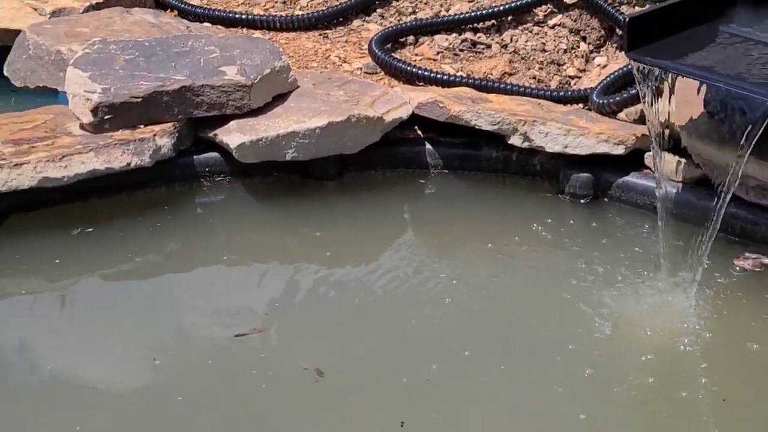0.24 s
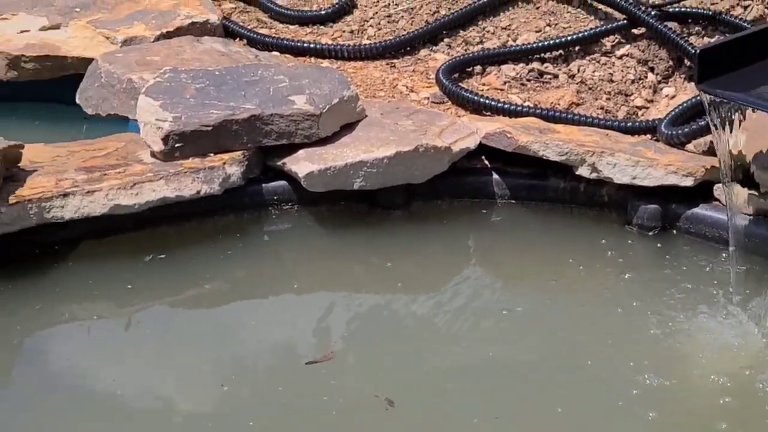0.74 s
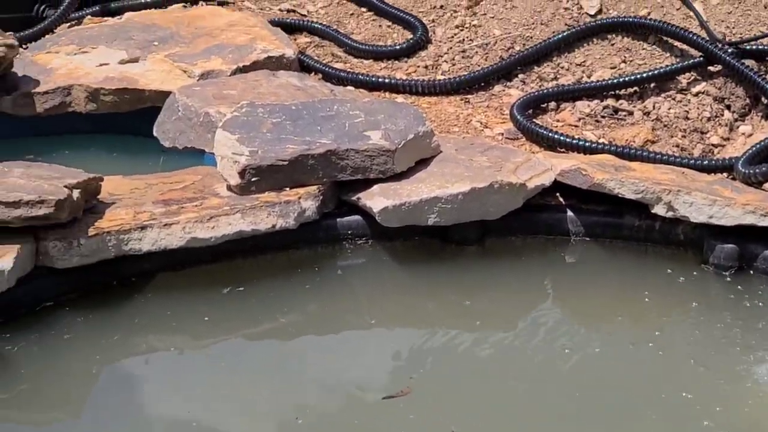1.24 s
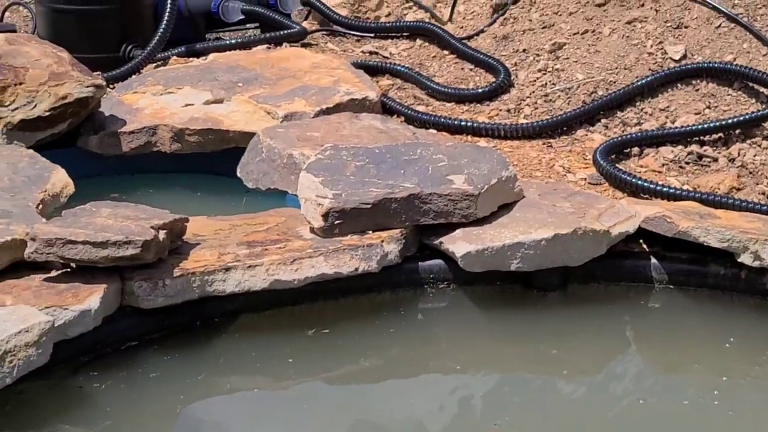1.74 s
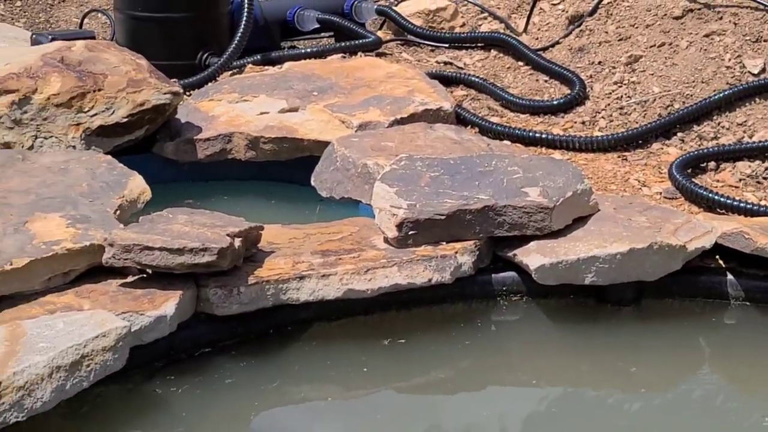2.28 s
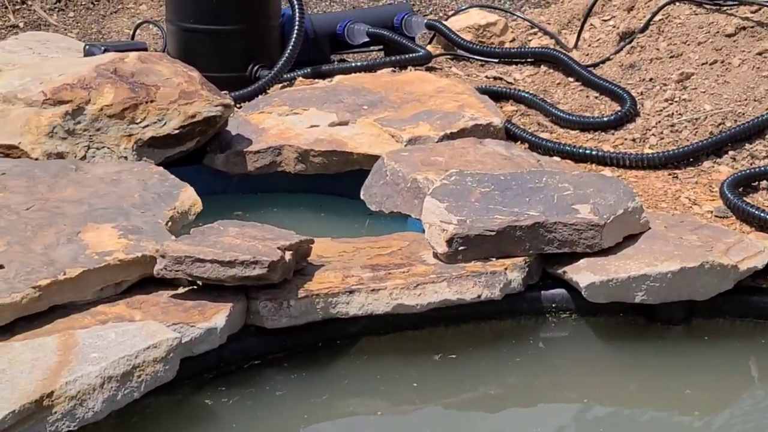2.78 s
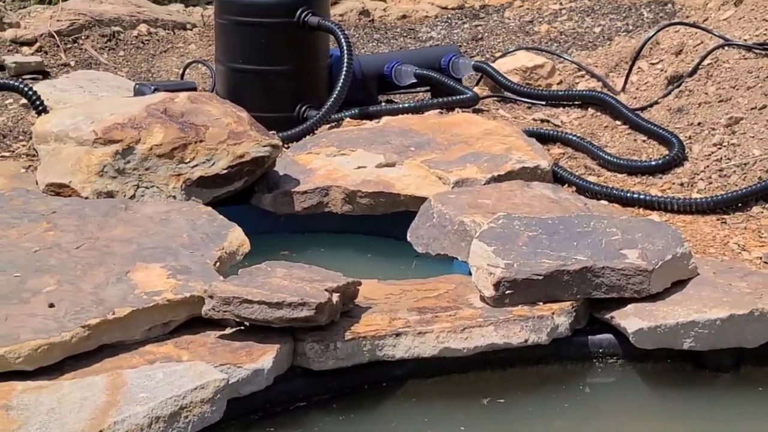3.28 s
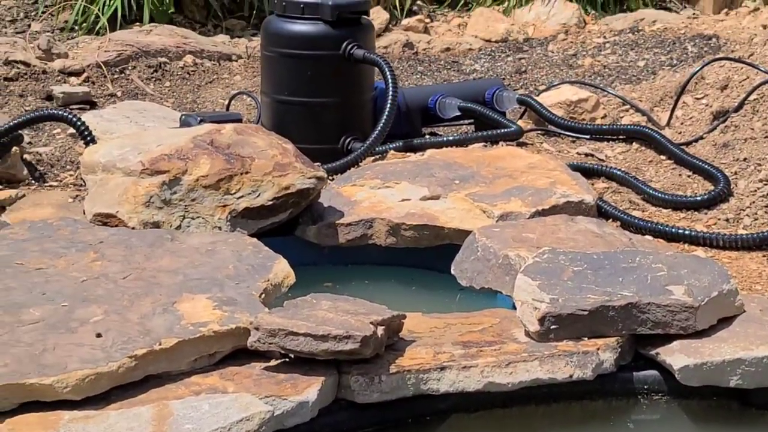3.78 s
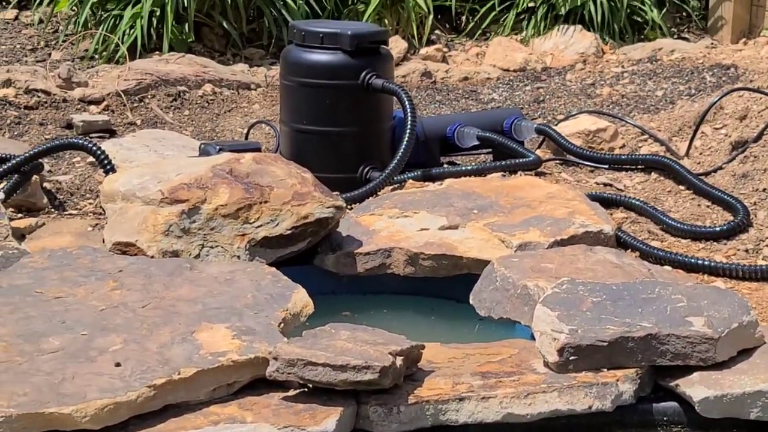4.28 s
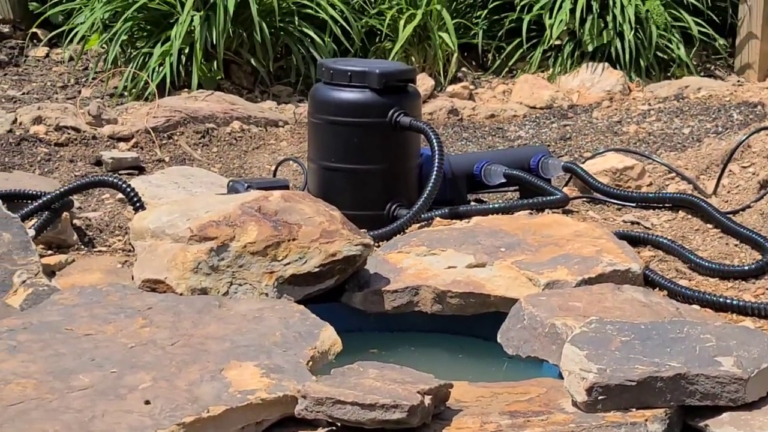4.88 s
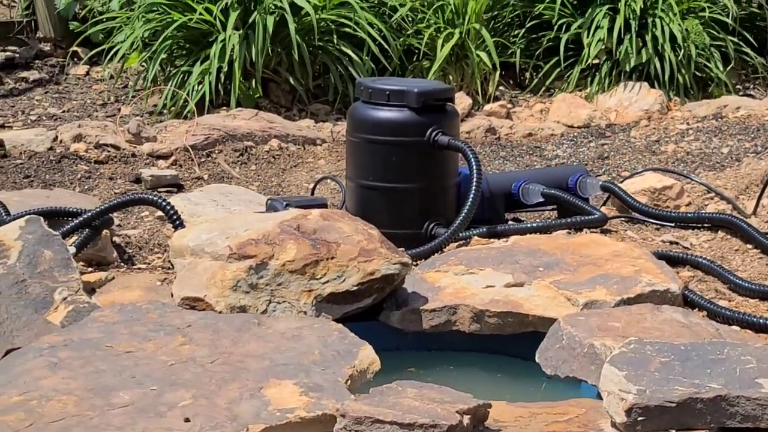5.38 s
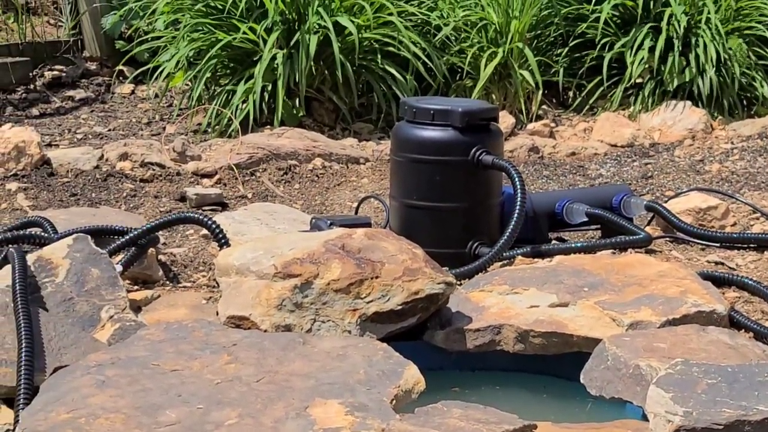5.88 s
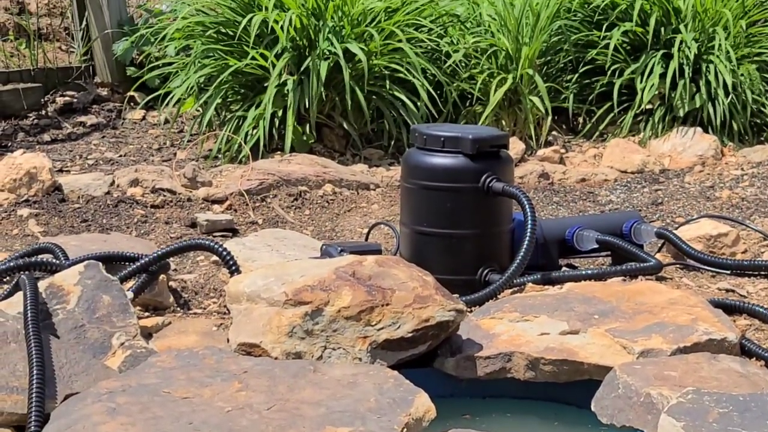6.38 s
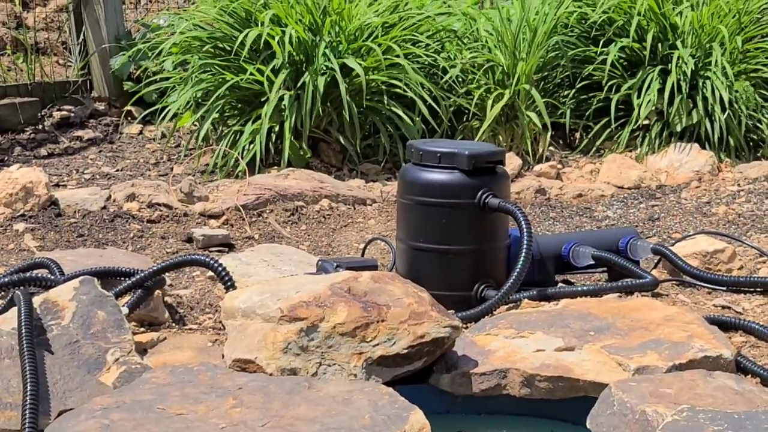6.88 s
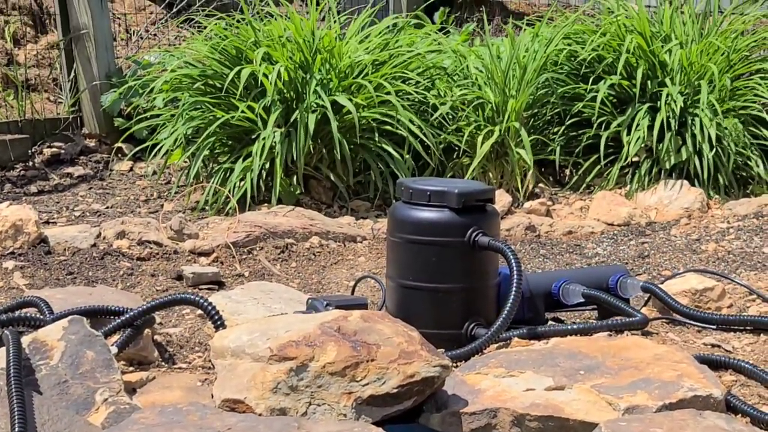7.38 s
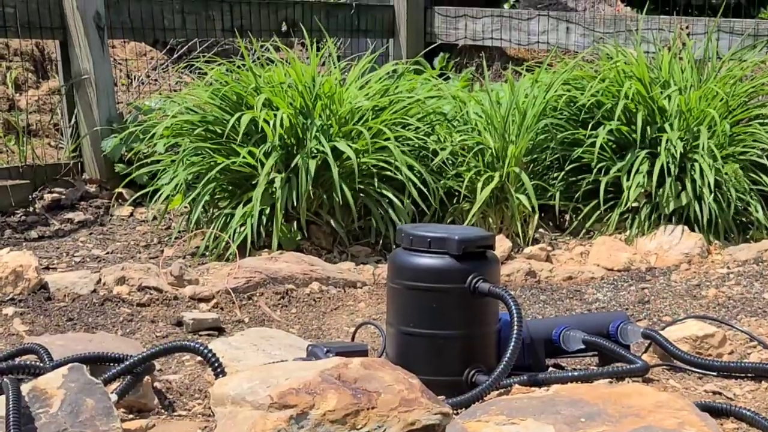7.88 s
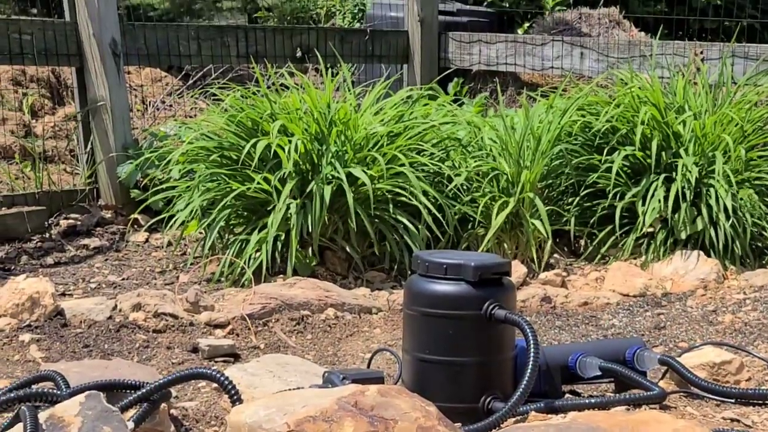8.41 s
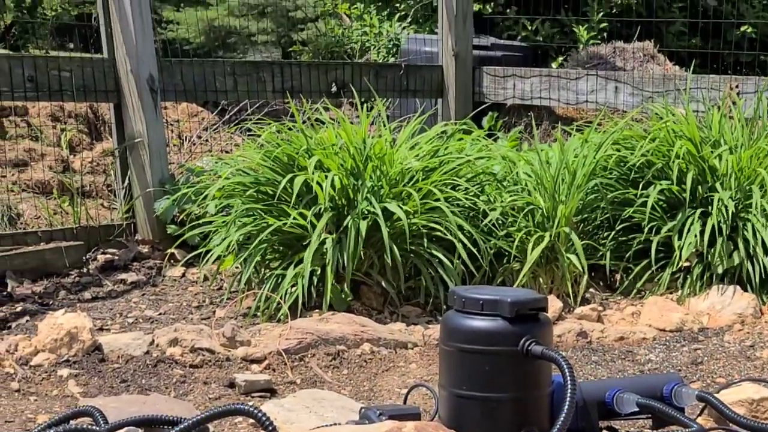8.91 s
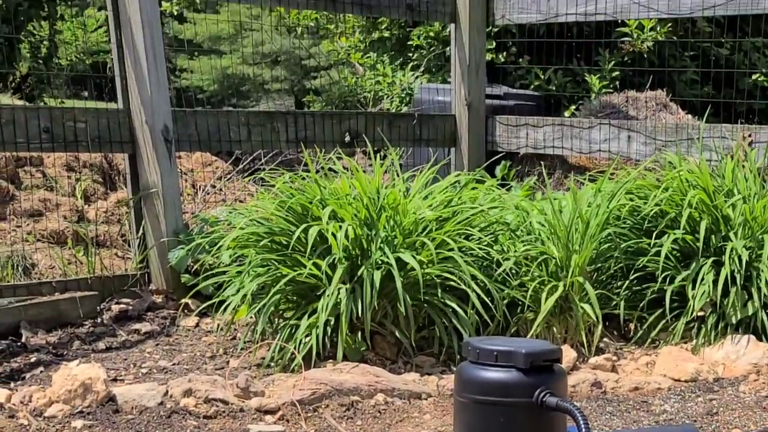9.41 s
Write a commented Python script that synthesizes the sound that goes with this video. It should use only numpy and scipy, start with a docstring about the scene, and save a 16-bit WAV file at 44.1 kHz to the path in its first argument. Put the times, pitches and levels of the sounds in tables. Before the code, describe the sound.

Outdoor pond with steady trickling and splashing water, two buzzy bird calls, then a bright, lively songbird over a faint pump hum and wind rumbles.

```python
"""A songbird strings whistled phrases together in a garden while a small waterfall splashes into a pond.
Farther birds whistle, buzz, chip and call, a pump drones, and gusts of wind thump on hand-held microphones.
Bird notes are near-sine tones gliding along pitch and level tables, with echoes; buzzes are shaken tones.
Water is banded noise with random drops, ringing bubbles and noise bursts; pump, wind and rasps are shaped noise."""
import sys
import numpy as np
from scipy import signal
from scipy.fft import rfft, irfft, next_fast_len
from scipy.io import wavfile
from scipy.ndimage import uniform_filter1d

SR = 44100
rng = np.random.default_rng(int(sys.argv[2]) if len(sys.argv) > 2 else 0)


def wrap_up_sound(samples):
    """Save the sound to the file named by the first command line argument, as 16-bit audio."""
    columns = np.atleast_2d(samples).T
    # keep every value between -1 and 1, then stretch to whole-number steps
    tamed = np.clip(columns, -1, 1)
    steps = np.round(tamed * 32767).astype(np.int16)
    wavfile.write(sys.argv[1], SR, steps)


N = 425565


def gain_of(db):
    """Decibels to gain."""
    return 10 ** (np.asarray(db) / 20)


def evened(x):
    """Scales to rms 1."""
    return x / np.sqrt(np.mean(x ** 2) + 1e-20)


def read(points, hz):
    """Reads a table on a log-frequency axis."""
    f, value = np.transpose(points)
    return np.interp(np.log(hz + 1), np.log(f + 1), value)


def along(rows):
    """Reads the second column of a time table, sample by sample."""
    s, value = np.transpose(rows)
    return np.interp(np.arange(N) / SR, s, value)


def add(mix, s, sound):
    """Mixes a sound in at time s."""
    part = mix[..., max(round(s * SR), 0):][..., :sound.shape[-1]]
    part += sound[..., :part.shape[-1]]


def coloured(x, gain):
    """Filters by multiplying the spectrum by gain(Hz)."""
    size = next_fast_len(x.shape[-1])
    spectrum = rfft(x, size) * gain(np.fft.rfftfreq(size, 1 / SR))
    return irfft(spectrum, size)[..., :x.shape[-1]]


def note(rows, overtones_db=(-60, -60)):
    """A near sine with faint second and third partials, following rows of t/s, f/Hz, level/dB."""
    s, hz, db = np.transpose(rows)
    t = np.arange(s[0], s[-1], 1 / SR)
    pitch = uniform_filter1d(np.interp(t, s, hz), 60)
    phase = 2 * np.pi * np.cumsum(pitch) / SR
    tone = np.sin(phase)
    for partial, partial_db in enumerate(overtones_db, 2):
        tone = tone + gain_of(partial_db) * np.sin(partial * phase)
    edge = np.clip(np.minimum(t - t[0], t[-1] - t) / .0012, 0, 1)  # 1.2 ms ramps at both ends
    return np.sqrt(2) * gain_of(np.interp(t, s, db)) * tone * edge


def stirred(x, depth, per_s):
    """Moving air and leaves make a sound's level flicker; the average power stays."""
    flicker = uniform_filter1d(rng.standard_normal(x.shape[-1]), max(round(SR / per_s), 2))
    flicker = evened(uniform_filter1d(flicker, 100))
    return x * (1 + depth * flicker) / np.sqrt(1 + depth ** 2)


def garden(x, t60, first_s):
    """Scattered echoes from fences and trees: sparse taps of random sign, other ones for each port."""
    spacing = 22  # samples
    slots = np.arange(0, SR - spacing, spacing)
    at = slots + rng.integers(0, spacing, (2, len(slots)))
    taps = np.zeros((2, SR))
    np.put_along_axis(taps, at, rng.choice([-1., 1.], at.shape), 1)
    t = np.arange(SR) / SR
    taps *= gain_of(-60 * t / t60) * np.clip(t / first_s - 1, 0, 1)
    taps /= np.linalg.norm(taps[0])
    return signal.fftconvolve(stirred(x, 2.8, 117)[None], taps, axes=1)[:, :N]


def ports(x, lean):
    """A quarter cycle late copy, added left and taken off right, shifts the phase between the ports."""
    late = lean * np.imag(signal.hilbert(x, next_fast_len(N))[:N])
    return np.array([x + late, x - late])


def spatter(per_s, spread_db, decay_s):
    """Envelope of drops landing at random, a few of them large, each dying away exponentially."""
    landing = rng.random(N) < per_s / SR
    size = gain_of(spread_db * np.minimum(rng.exponential(1, N), 4)) * landing
    power = signal.lfilter([1], [1, -np.exp(-2 / (decay_s * SR))], size ** 2)
    smooth = uniform_filter1d(uniform_filter1d(power, 130), 130)
    return evened(np.sqrt(abs(smooth)))


def spray():
    """Noise in overlapping bands; a drop sounds in two neighbouring bands, sharp ones tick in all."""
    sharp, out = spatter(20, 3.8, .003), np.zeros((2, N))
    below = spatter(25, 3.0, 0.041)
    for hz in np.geomspace(250, 16000, 7):
        above = spatter(25, 3.4, 0.003 + 8 / hz)
        level = 1 + sharp * (hz / 40000) ** .5  # the ticks are strongest in the treble
        level = level + 0.64 * (below + above) + 0.066 * spatter(300, 1.7, 0.0013)
        octave = lambda f: np.cos(np.pi / 2 * np.clip(np.log2((f + 1) / hz), -1, 1))
        out += coloured(rng.standard_normal((2, N)) * evened(level), octave)
        below = above
    return out


def bubbles(per_s, low_hz, high_hz, cycles):
    """Trapped air rings in short rising tones; small bubbles ring higher and die sooner."""
    out = np.zeros(N)
    for hz in np.geomspace(low_hz, high_hz, 24):
        turns = np.arange(int(3 * cycles * SR / hz)) * hz / SR
        ring = np.sin(2 * np.pi * turns * (1 + 0.0047 * turns))
        ring *= np.exp(-turns / cycles) * (1 - np.exp(-turns))
        size = gain_of(4.55 * np.minimum(rng.exponential(1, N), 4))
        size *= rng.random(N) < per_s / 24 / SR
        out += signal.oaconvolve(size, ring)[:N]
    return evened(out)


def waterfall():
    """Spray and bubbles: the ports share the lows, the right one late, and differ in the highs."""
    # spectrum of the falling water: f/Hz, density/dB per Hz, relative
    fall = [(150, -1.5), (244, -8.5), (321, -19), (376, -14), (555, -24), (837, -5), (1100, -15), (1550, 0),
            (2000, -9), (3300, -7.5), (3800, -9.5), (4250, -6.5), (5000, -14.5), (6500, -15.5), (8500, -21),
            (11000, -18), (14000, -20), (16000, -24.5)]
    # overall loudness: t/s, level/dB
    fall_db = [(0, -41.5), (5, -42.5), (9.65, -41.5)]
    # likeness of the ports: f/Hz, share of amplitude in common [0 to 1]
    likeness = [(200, 0.99), (700, 0.93), (1200, 0.34), (3000, 0.09), (8000, 0.17), (15000, 0.26)]
    # phase by which the left port leads: f/Hz, lead/radians
    leads = [(100, -1), (950, 1.03), (1300, 0.86), (3000, 6.5), (7500, 6), (15000, 19)]
    # balance of the ports: f/Hz, left over right/dB
    tilt = [(200, -2), (700, 1.5), (2400, -1.5), (5000, -1), (9000, -2.5), (14000, 3)]
    shared, own = spray()
    froth = coloured(bubbles(500, 295.6, 11040, 6.2), lambda hz: (hz > 200) * (hz / 1500) ** 0.66)
    shared = evened(shared) + 0.54 * evened(froth)
    same = lambda hz: np.clip(read(likeness, hz), 0, 1)
    right = coloured(shared, lambda hz: same(hz) * np.exp(-1j * read(leads, hz)))
    right += coloured(evened(own), lambda hz: np.sqrt(1 - same(hz) ** 2))
    side = np.array([[.5], [-.5]])
    colour = lambda hz: gain_of(read(fall, hz) + side * read(tilt, hz)) * (hz > 150)
    return gain_of(along(fall_db)) * evened(coloured(np.array([shared, right]), colour))


def pump():
    """Fuzzy low tones, narrow bands of noise that swell and sink, nearly alike at both ports."""
    # humming bands: f/Hz, width/Hz, relative level/dB
    drone = [(246, 21, 3), (364, 19.2, 4)]
    # swell of the hum: t/s, level/dB
    drone_db = [(0, -58), (1.8, -60), (2.4, -58.5), (4.3, -60.5), (4.7, -60), (5.9, -55), (6.5, -63.5),
                (7.5, -60), (9.65, -78)]
    bands = lambda hz: sum(gain_of(db) * np.exp(-((hz - f) / w) ** 2) for f, w, db in drone)
    hum, fuzz = evened(coloured(rng.standard_normal((2, N)), bands)) * gain_of(along(drone_db))
    return np.array([hum + 0.45 * fuzz, hum - 0.24 * fuzz])


def wind():
    """Lumpy pressure swings at the ports, as low noise; some gusts flutter faster."""
    # strength of the gusts: t/s, level/dB
    gusts = [(0, -41), (1.9, -47), (2.8, -36), (3.1, -45.5), (4.25, -38), (4.56, -44), (4.64, -23),
             (4.87, -38.5), (4.98, -29), (5.15, -35), (5.4, -31), (5.8, -40), (6.6, -46.5), (6.72, -28.5),
             (7.02, -29), (7.12, -49), (8.1, -37.5), (8.37, -28.5), (8.46, -39.5), (8.7, -28.5),
             (9.15, -41), (9.27, -28.5), (9.52, -42), (9.65, -26.5)]
    # spectrum of the thumping: f/Hz, density/dB per Hz, relative
    wind_colour = [(18, -10), (54, -5), (70, 1), (90, -6), (123, -12.5), (163, -28.5), (300, -36)]
    # quicker buffeting: t/s, length/s, peak level/dB
    flutters = [(4.642, 0.14, -42), (6.703, 0.13, -30), (6.952, 0.08, -29), (8.623, 0.1, -32.5),
                (9.255, .15, -31.5), (9.598, 0.16, -37)]
    lumps = uniform_filter1d(uniform_filter1d(rng.standard_normal(N), 2000), 2000)
    lumps = evened(gain_of(2.0 * evened(lumps)))
    noise, flutter = rng.standard_normal((2, N)), np.zeros(N)
    low = evened(coloured(noise, lambda hz: gain_of(read(wind_colour, hz)) * (hz > 18) * (hz < 300)))
    upper = evened(coloured(noise[::-1], lambda hz: np.exp(-((hz - 130) / 50) ** 2)))
    for s, length, db in flutters:
        add(flutter, s, gain_of(db) * np.hanning(round(length * SR)))
    middle, side = lumps * gain_of(along(gusts)) * low + flutter * upper
    return np.array([middle + .5 * side, middle - .5 * side])


def opening_whistle():
    """Two sine voices at once, the higher one 6 dB softer."""
    # t/s, low f/Hz, high f/Hz, low voice level/dB
    whistle_rows = np.array([(0, 3500, 3790, -50), (.03, 3500, 3770, -41), (.11, 3487, 3680, -38),
                             (0.172, 3500, 3730, -44), (.24, 3500, 3780, -52), (.31, 3480, 3670, -54)])
    return note(whistle_rows[:, [0, 1, 3]]) + gain_of(-6.0) * note(whistle_rows[:, [0, 2, 3]])


def splashes():
    """Loud single splashes: sharp bursts of noise, each brightest around one pitch, with a wet tail."""
    # t/s, peak level/dB, brightest f/Hz, spread/octaves
    splash_rows = [(.297, -26, 5550, 0.49), (.451, -24.5, 1250, 0.76), (0.508, -25.5, 1505, 0.088),
                   (0.773, -23, 4100, 0.75), (0.999, -29.5, 4140, 0.3), (1.202, -25.5, 4600, 0.49),
                   (1.403, -31, 1060, 0.52), (2.563, -34.5, 1430, 0.12), (2.883, -37, 7500, 0.37),
                   (2.933, -33.5, 6100, 0.18), (2.976, -31, 4970, 1.1), (3.922, -24.5, 5700, 0.58),
                   (4.207, -32.5, 6440, 0.51), (4.533, -33, 5540, 0.45), (4.656, -23, 816, 1.65),
                   (4.864, -26.5, 1650, 0.15), (4.882, -27, 800, 1.6), (5.27, -23, 4640, 0.16),
                   (5.52, -32, 5540, 0.18), (5.833, -28.5, 2500, 1.7), (7.327, -28, 4380, 0.51),
                   (7.434, -27.5, 1540, 0.075), (7.741, -31.5, 5900, 0.27), (8.174, -22.5, 5870, 0.86),
                   (8.239, -31, 11000, 0.56), (8.703, -18.5, 4900, 0.68)]
    out, t = np.zeros((2, N)), np.arange(3000) / SR
    for s, db, hz, octaves in splash_rows:
        middle, side = rng.standard_normal((2, len(t)))
        side = hz / 7000 * side  # brighter splashes sound wider
        envelope = (1 - np.exp(-t / 0.002)) * (np.exp(-t / (0.0028 + 3 / hz)) + 0.22 * np.exp(-t / 0.019))
        burst = np.array([middle + side, middle - side]) * envelope
        burst = coloured(burst, lambda f: 1 / (1 + (np.log2((f + 1) / hz) / octaves) ** 4))
        add(out, s, gain_of(db) * burst / abs(burst.mean(0)).max())
    return out


def buzz(length, hz, swing_hz, per_s, db):
    """Starts as a clean whistle; uneven shaking then widens it into a grainy rasp that fades."""
    t = np.arange(0, length, 1 / SR)
    depth = np.clip((t - .014) / 0.033, 0, 1)
    wobble, grain = evened(uniform_filter1d(rng.standard_normal((2, len(t))), 200))
    shake = np.sin(2 * np.pi * np.cumsum(per_s * (1 + 0.33 * wobble)) / SR)
    pitch = hz - 200 * (1 - depth) - 250 * t / length + swing_hz * depth * (shake + 0.137 * grain)
    tone = np.sin(2 * np.pi * np.cumsum(pitch) / SR)
    level_db = db - 14 * (t / length) ** 2 + 3 * depth * grain
    edges = np.clip(t / 0.0068, 0, 1) * np.clip((length - t) / 0.019, 0, 1)
    return gain_of(level_db) * tone * (1 + 0.31 * depth * shake) * edges


def rasp(length, hz, width, db):
    """A faint hoarse call: a band of noise throbbing 90 times a second."""
    t = np.arange(0, length, 1 / SR)
    noise = coloured(rng.standard_normal(len(t)), lambda f: np.exp(-((f - hz) / width) ** 2))
    throb = 1 + .5 * np.sin(2 * np.pi * 90 * t)
    return gain_of(db - 6 * t / length) * evened(noise) * throb * signal.windows.tukey(len(t), .3)


def slur(s, length, from_hz, to_hz, db, loudest):
    """A straight glide that swells from 15 dB down and sinks back."""
    u, top = np.linspace(0, 1, 30), np.clip(loudest, .05, .95)
    away = np.where(u < top, 1 - u / top, (u - top) / (1 - top))
    return np.transpose([s + length * u, from_hz + (to_hz - from_hz) * u, db - 15 * away ** 1.9])


def hold(s, length, from_hz, hz, drop_s, start_db, db, held_db,
         bend=1.355, loudest=.65, sag_db=-3.5, hover=0):
    """The pitch drops in a curve and stays; the level turns before the landing, settles and sags."""
    settle_s = 0.017
    t = np.linspace(0, length, 60)
    level_s = [0, loudest * drop_s, drop_s + settle_s, max(length, drop_s + 1.5 * settle_s)]
    level_db = np.interp(t, level_s, [start_db, db, held_db, held_db + sag_db])
    to_go = np.clip((1 - t / drop_s) / (1 - hover), 0, 1)  # hover: share of the drop spent at the top
    return np.transpose([s + t, hz + (from_hz - hz) * to_go ** bend, level_db])


def warble(s, gap_s, start_hz, peak_hz, peak_db, db, dip_s, dip_hz, dip_db, last_s, last_db, end_s):
    """Two quick arches of pitch, a dip, and a climb onto a last steady note."""
    # W shape around the second peak: t/s, f/Hz, relative level/dB; the part before it is stretched
    warble_shape = [(-.027, 3080, -5), (-.021, 2740, -24), (-.015, 3036, 2), (-.008, 3830, -17),
                    (-.003, 3953, -3), (.003, 3900, -11), (.011, 3080, -1), (.017, 2600, -8.5)]
    shape_gap_s, last_hz = .035, 2709
    t, hz, shape_db = np.transpose(warble_shape)
    t = np.where(t < 0, t * gap_s / shape_gap_s, t)
    t = np.r_[-gap_s - .011, -gap_s, t, dip_s, last_s - 0.0159, last_s, end_s]
    hz = np.r_[start_hz, peak_hz, hz, dip_hz, .98 * last_hz, last_hz, last_hz]
    level_db = np.r_[peak_db - 4, peak_db, db + shape_db, dip_db, last_db - 12.5, last_db, last_db - 11]
    return np.transpose([s + t, hz, level_db])


def tew(s, dive_s, top_hz, start_db, dive_db, held_db, bell_s, bell_db, tail_s, tail_db, under_db):
    """A call of dive, bell note and tail, with a second voice sounding just before the bell note."""
    bell_length = .03  # s
    bell, tail = bell_s - bell_length / 2, bell_s + bell_length / 2
    return [hold(s, bell, top_hz, 2880, dive_s, start_db, dive_db, held_db,
                 bend=1.8, loudest=0.92, sag_db=-10, hover=.2),
            slur(s + bell, bell_length, 2985, 2780, bell_db, 0.46),
            slur(s + tail - .004, tail_s - tail + 0.0049, 2730, 2405, tail_db, 0.5),
            slur(s + bell_s - .032, .027, 2346, 2163, under_db, .4)]


def singer():
    """The near bird's slurs, held notes, warbles and dives, with close and far echoes."""
    # second and third partial: level/dB
    overtones_db = (-43, -39)
    # lean to one port as the microphones turn: t/s, share [-1 to 1]
    lean = [(2, 0.9), (3.2, 0.66), (4.4, 0.57), (5.4, -0.64), (6.5, -0.72), (7.2, -0.59), (8.5, -0.7),
            (9.6, -0.45)]
    # plain slurs, up or down: t/s, length/s, from f/Hz, to f/Hz, level/dB, loudest at share of length
    slurs = [(2.085, 0.014, 2436, 2400, -27, 0.57), (2.102, .03, 2450, 2540, -23, 0.71),
             (2.136, 0.026, 2690, 2870, -25.5, 0.8), (2.154, .014, 3130, 3400, -25, 0.61),
             (2.164, 0.025, 2560, 2280, -20.5, 0.23), (2.593, 0.016, 2880, 2700, -38, .5),
             (2.607, .018, 2480, 2380, -24.5, 0.69), (2.627, 0.028, 2410, 2556, -20, 0.33),
             (2.651, 0.029, 2670, 2900, -26.5, .5), (2.675, 0.0092, 3120, 3430, -26.5, 0.46),
             (2.68, 0.025, 2550, 2210, -19.5, 0.15), (3.016, 0.039, 3260, 3100, -28, 0.58),
             (3.038, 0.056, 3140, 2690, -25, .3), (3.091, 0.032, 2316, 2476, -23, 0.91),
             (3.237, 0.057, 2080, 2190, -36.5, 0.54), (3.295, 0.027, 2260, 2650, -23, 0.53),
             (3.408, 0.041, 3330, 2990, -22.5, 0.6), (3.443, 0.04, 2950, 2570, -22.5, 0.52),
             (3.488, 0.019, 2250, 2560, -20.5, 0.63), (3.507, 0.02, 2620, 2860, -22.5, .4),
             (3.641, 0.055, 2026, 2100, -34.5, .5), (3.704, 0.059, 1920, 2290, -36, 0.18),
             (3.875, 0.035, 3420, 2950, -20.5, 0.67), (3.902, 0.038, 2970, 2630, -19, 0.43),
             (3.948, 0.022, 2330, 2600, -22.5, .35), (3.964, 0.023, 2650, 2840, -23.5, 0.27),
             (4.129, 0.034, 2240, 2270, -25.5, 0.36), (4.162, 0.023, 2213, 2405, -18, 0.45),
             (4.309, 0.028, 3220, 3235, -21, 0.63), (4.323, .052, 3280, 2760, -17, 0.18),
             (4.386, .024, 2460, 2590, -19.5, .55), (4.407, 0.027, 2700, 2705, -17.5, 0.35),
             (5.332, 0.058, 3495, 2870, -15.5, 0.67), (5.403, 0.018, 2400, 2680, -33, .7),
             (5.411, 0.033, 2700, 2760, -13.5, 0.5), (5.58, 0.024, 2120, 2380, -30, 0.53),
             (5.617, 0.029, 2354, 2494, -20, 0.55), (6.112, 0.035, 3570, 3370, -28.5, 0.8),
             (6.222, 0.026, 3930, 3160, -21, 0.95), (6.259, 0.033, 2725, 2756, -17, 0.66),
             (6.471, .045, 3163, 2974, -13.5, 0.8), (6.508, 0.034, 2977, 2800, -19.5, 0.32),
             (6.537, 0.019, 2750, 2840, -26, 0.36), (6.562, 0.02, 4040, 3060, -20.5, 0.28),
             (6.58, 0.011, 2340, 2610, -25, 0.63), (6.588, 0.024, 2720, 2732, -16, 0.48),
             (6.602, 0.048, 2520, 1590, -23.5, 0.12), (7.842, 0.057, 2700, 2680, -37, 0.44)]
    # drops onto a held tone: t/s, length/s, from f/Hz, held f/Hz, drop/s, then start, turning
    # and held level/dB
    holds = [(2.201, 0.085, 2250, 2040, 0.021, -40, -29.5, -32.5),
             (2.718, 0.11, 2214, 1972, 0.028, -36, -32, -36),
             (3.138, .102, 2226, 1770, .028, -37, -24.5, -32.5),
             (3.532, .106, 2395, 1747, 0.039, -30, -21.5, -36),
             (3.999, 0.094, 2140, 1742, .04, -28, -23, -33),
             (4.444, 0.093, 2170, 1750, 0.026, -30, -23.5, -29.5),
             (5.457, .09, 2177, 1784, 0.032, -30, -28, -31.5),
             (6.137, 0.092, 3450, 2918, 0.027, -27, -14.5, -25.5),
             (6.283, .06, 2556, 1927, .04, -21, -30.5, -33.5)]
    # warbles: second peak t/s, gap between peaks/s, start f/Hz, first peak f/Hz, its level/dB, level/dB,
    # dip after/s, dip f/Hz, dip level/dB, last note after/s, its level/dB, end after/s
    warbles = [(6.818, 0.031, 3770, 4170, -21.5, -17.5, .025, 2254, -27, 0.067, -19.5, 0.073),
               (7.013, 0.031, 3690, 4080, -21, -16, 0.021, 2275, -26.5, 0.069, -14.5, 0.083),
               (7.224, 0.035, 3640, 4090, -21, -15.5, 0.024, 2420, -26, 0.057, -15, 0.081),
               (7.431, 0.031, 4360, 4270, -25.5, -17, .026, 2405, -28, .053, -19.5, 0.061),
               (7.655, 0.034, 3660, 3910, -21, -16.5, 0.029, 2410, -29, 0.052, -18.5, 0.074)]
    # dive, bell, tail: t/s, dive/s, top f/Hz, start, landing and held level/dB, bell after/s, its level/dB,
    # tail end after/s, its level/dB, second voice level/dB
    tews = [(8.261, 0.031, 4450, -24, -29, -40, 0.066, -20, 0.11, -26.5, -35),
            (8.446, 0.041, 4800, -22, -19.5, -48, 0.066, -14.5, 0.11, -34, -34),
            (8.897, 0.036, 4690, -28, -24, -33, .075, -18, 0.11, -22.5, -31.5),
            (9.114, 0.032, 4640, -37, -10.5, -20, .069, -12.5, 0.1, -20, -29.5),
            (9.478, 0.036, 4640, -37, -16.5, -28, 0.076, -12, .112, -29, -33)]
    # some pitches carry better than others along the path: f/Hz, added level/dB
    carry = [(1700, -1), (2050, -0.8), (2250, -3), (2430, -0.5), (2570, -5), (2740, -1.26), (2930, -5),
             (3150, 0.3), (3500, -6.5), (3900, 1), (4600, -9)]
    # echoes off ground and rocks: late/s, left level/dB, right level/dB before it is halved and inverted
    near = [(.0031, -32, -17), (.0068, -6, -12.5), (.011, -7, -25)]
    notes = [slur(*r) for r in slurs] + [hold(*r) for r in holds] + [warble(*r) for r in warbles]
    notes += [part for r in tews for part in tew(*r)]
    song = np.zeros(N)
    for s, hz, db in map(np.transpose, notes):
        tone = note(np.transpose([s, hz, db + read(carry, hz)]), overtones_db)
        add(song, s[0], stirred(tone, .15, 194))
    dull = coloured(song, lambda f: 1 / (1 + (f / 4900) ** 4))  # echoes from far off are duller
    out = ports(song, along(lean)) + gain_of(-11.0) * garden(dull, 0.67, 0.0018)
    for late, *db in near:
        add(out, late, gain_of(db)[:, None] * [[1], [-.5]] * song)
    return out


def chips():
    """A small bird's chips: one quick falling tone, repeated at different levels."""
    # t/s, level/dB
    chip_times = [(3.037, -42), (3.708, -38), (4.076, -39.5), (4.307, -44), (4.516, -38.5), (4.644, -38.5),
                  (5.02, -38.5), (5.4, -40.5), (7.553, -33), (7.886, -34), (8.076, -39.5), (8.186, -44),
                  (8.308, -40), (8.398, -35), (8.494, -36), (8.583, -38), (8.672, -39), (8.759, -38.5),
                  (8.862, -38.5), (8.952, -42)]
    # one chip: t/s, f/Hz, relative level/dB
    chip_shape = [(-.004, 10180, -25), (.004, 8880, -16.5), (.016, 7940, -9), (.025, 7750, -4),
                  (.036, 7170, -18)]
    out = np.zeros(N)
    for s, db in chip_times:
        add(out, s + chip_shape[0][0], gain_of(db) * note(chip_shape, (-12, -60)))
    return out


def far_calls():
    """A far bird's calls: sines that arch up and down."""
    # per call, rows of t/s, f/Hz, level/dB before distance
    call_rows = [
        [(4.73, 2760, -50), (4.76, 3100, -47), (4.78, 4030, -44), (4.8, 3900, -53), (4.823, 2830, -35),
         (4.85, 2300, -60)],
        [(8.7, 3580, -53), (8.72, 4100, -45), (8.75, 3560, -46), (8.78, 2500, -51)],
    ]
    out = np.zeros(N)
    for rows in call_rows:
        add(out, rows[0][0], note(rows))
    return out


def distant_birds():
    """Whistle, buzzes, rasps, chips and far calls, blurred by flicker and scattered echoes."""
    # whistles shaken in pitch: t/s, length/s, centre f/Hz, swing/Hz, shakes per s, level/dB
    buzz_rows = [(0.343, 0.18, 5820, 730, 260, -31), (0.645, 0.19, 5710, 736, 260, -29.5)]
    # faint hoarse calls: t/s, length/s, centre f/Hz, width/Hz, level/dB
    rasp_rows = [(.45, .1, 2400, 900, -41), (.56, .07, 3900, 500, -42), (.89, .17, 2500, 900, -41),
                 (5.58, .19, 4300, 700, -47), (8.56, .09, 3700, 700, -43)]
    low, high, far = np.zeros(N), chips(), far_calls()
    add(low, 0, opening_whistle())
    for s, *rest in buzz_rows:
        add(high, s, buzz(*rest))
    for s, *rest in rasp_rows:
        add(low, s, rasp(*rest))
    out = ports(low, 0.96)
    out += ports(stirred(high, 0.18, 280), 0.73) * gain_of([[1.5], [-1.5]])  # a little to the left
    out += gain_of(-5.0) * garden(low + high, 0.35, 0.0075)
    return out + 0.85 * stirred(far, 0.35, 150) + garden(far, 0.15, 0.0018)


def scene():
    """Water, pump, wind and birds together."""
    return waterfall() + pump() + wind() + distant_birds() + splashes() + singer()


def record(dry):
    """The band limit: a steep low-pass at 15.8 kHz."""
    low_pass = signal.firwin(511, 15800, window=("kaiser", 9), fs=SR)
    return signal.oaconvolve(dry, low_pass[None], "same")


dry = scene()
out = record(dry)
wrap_up_sound(out)
```